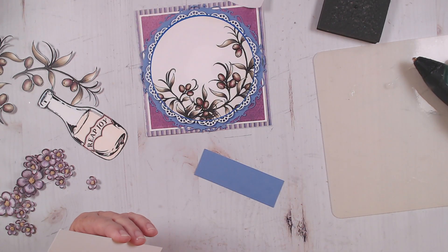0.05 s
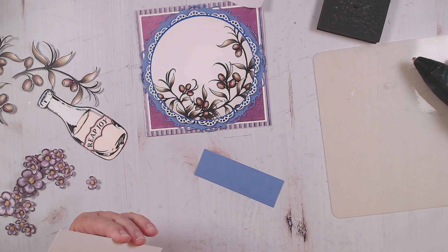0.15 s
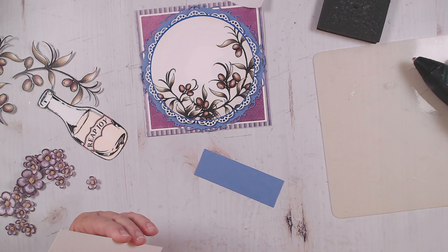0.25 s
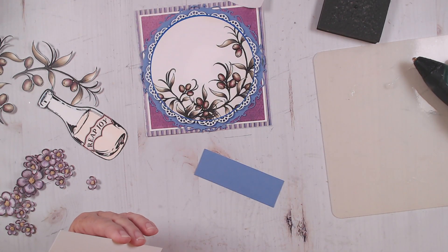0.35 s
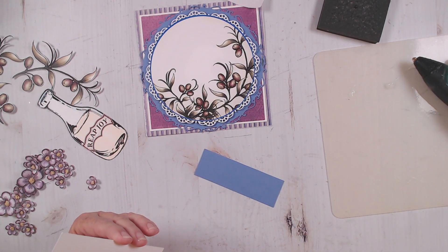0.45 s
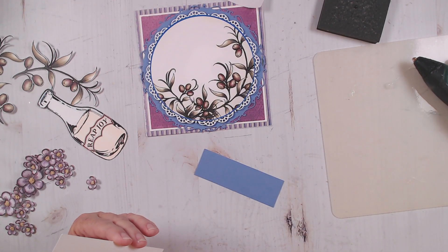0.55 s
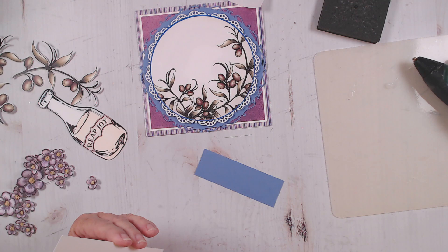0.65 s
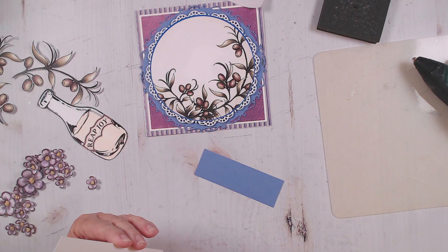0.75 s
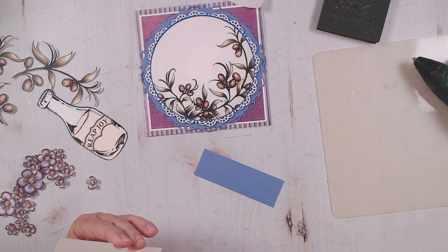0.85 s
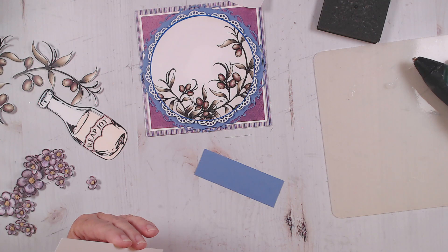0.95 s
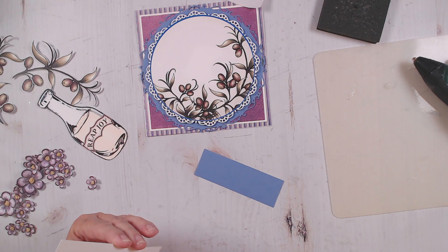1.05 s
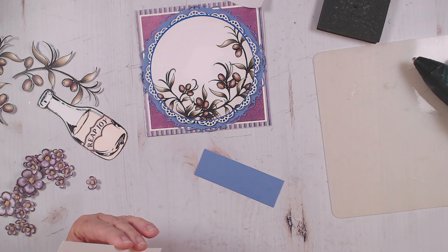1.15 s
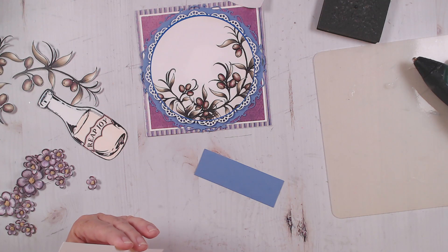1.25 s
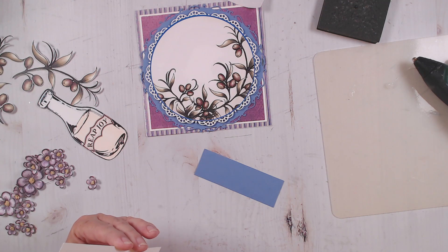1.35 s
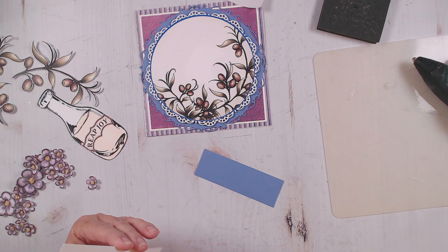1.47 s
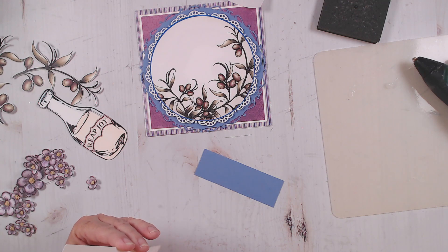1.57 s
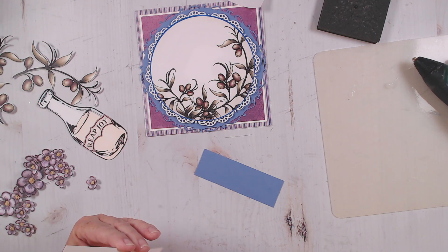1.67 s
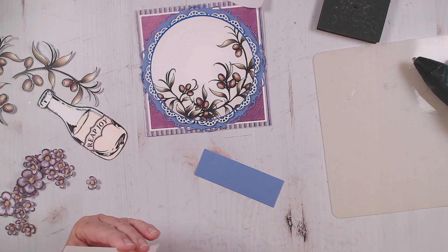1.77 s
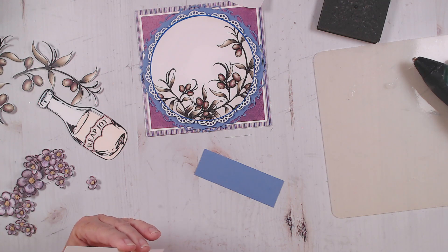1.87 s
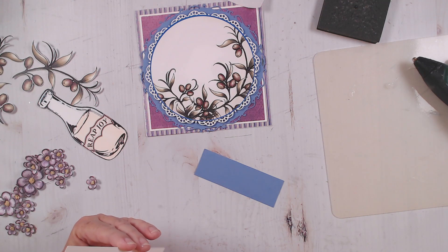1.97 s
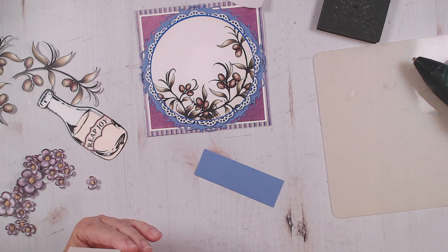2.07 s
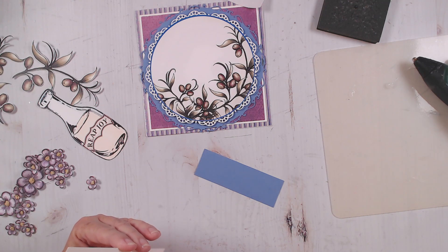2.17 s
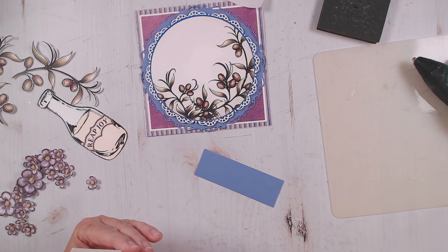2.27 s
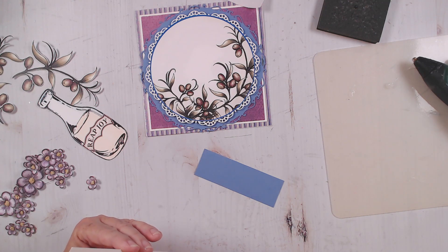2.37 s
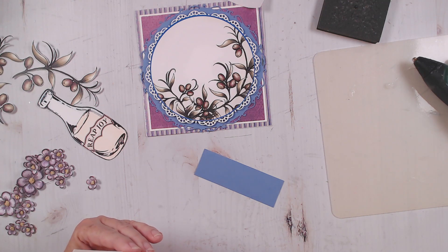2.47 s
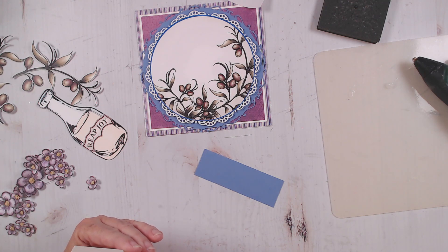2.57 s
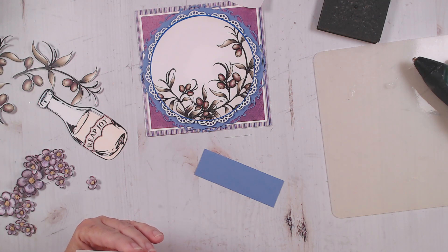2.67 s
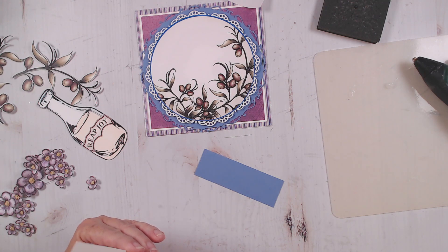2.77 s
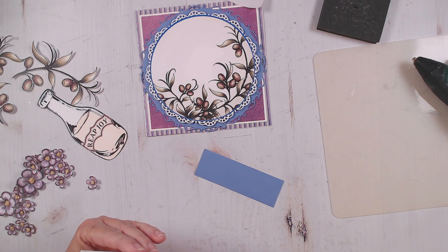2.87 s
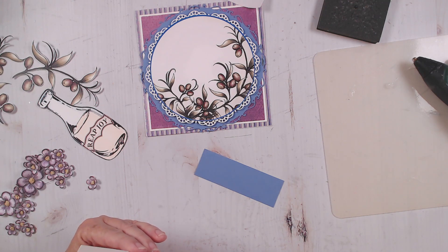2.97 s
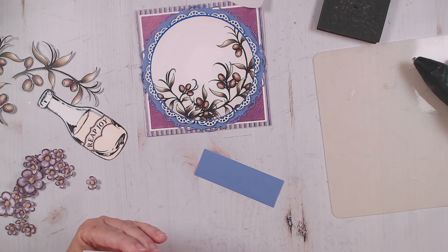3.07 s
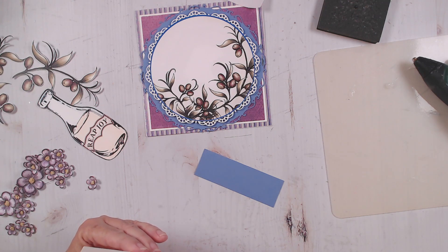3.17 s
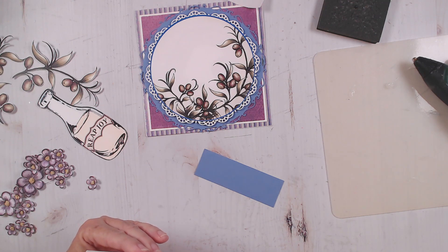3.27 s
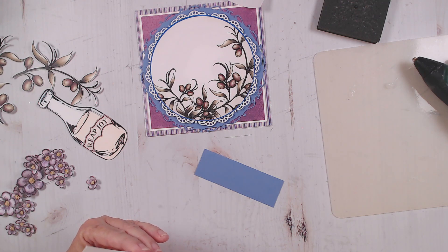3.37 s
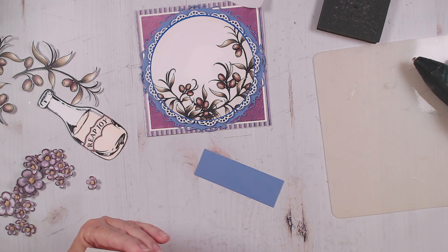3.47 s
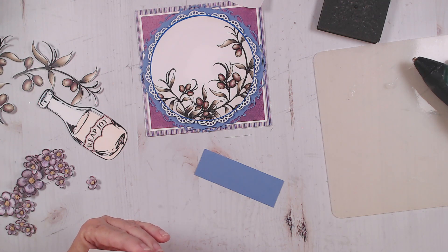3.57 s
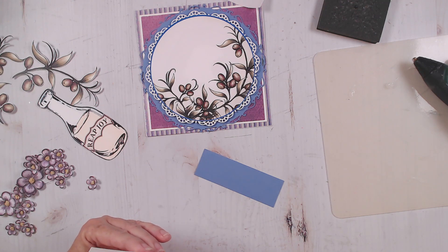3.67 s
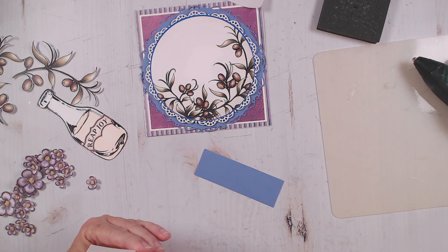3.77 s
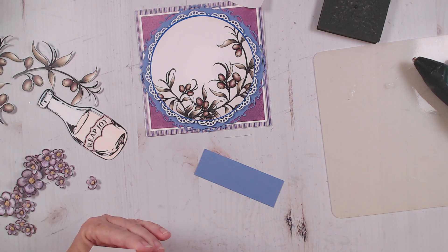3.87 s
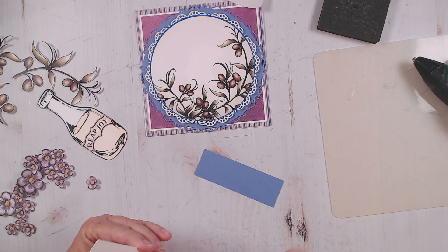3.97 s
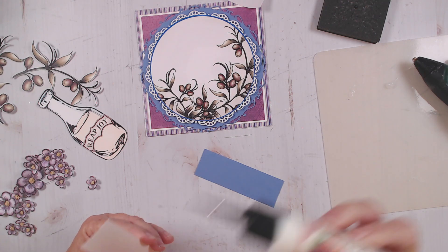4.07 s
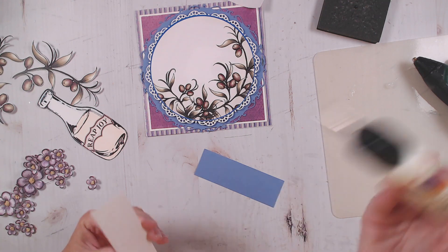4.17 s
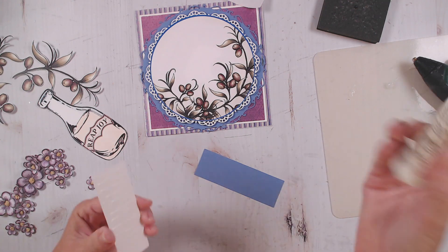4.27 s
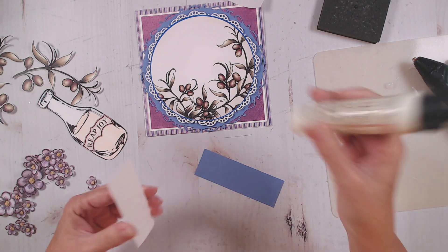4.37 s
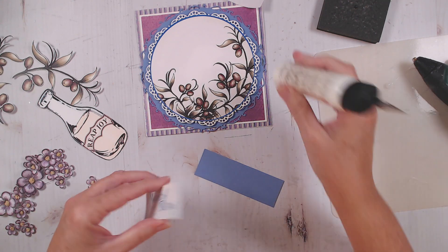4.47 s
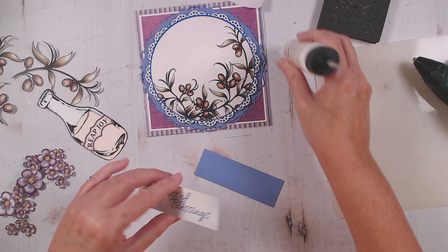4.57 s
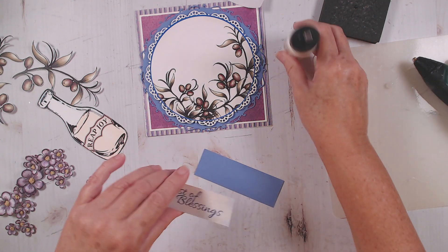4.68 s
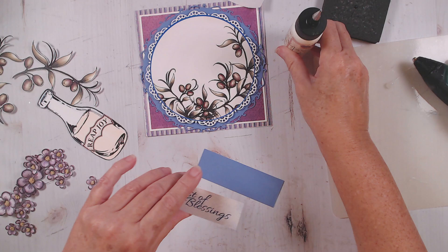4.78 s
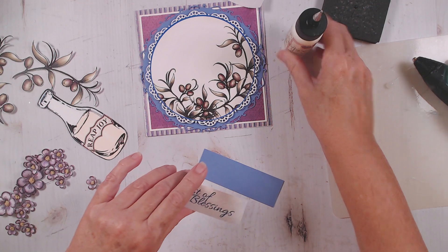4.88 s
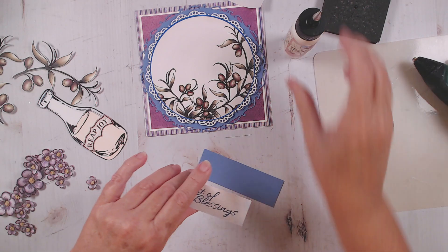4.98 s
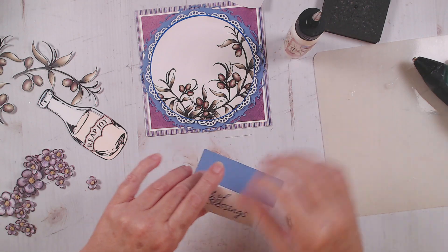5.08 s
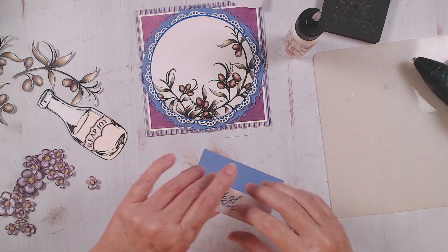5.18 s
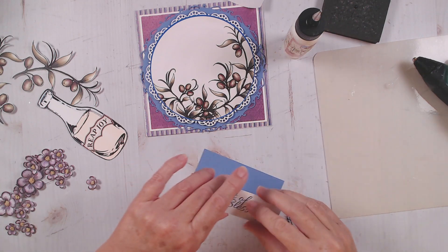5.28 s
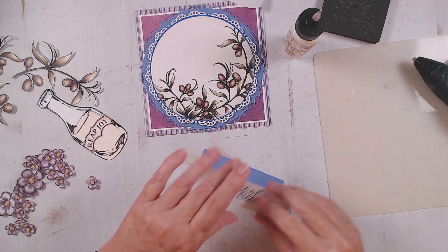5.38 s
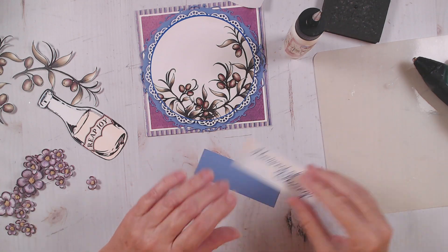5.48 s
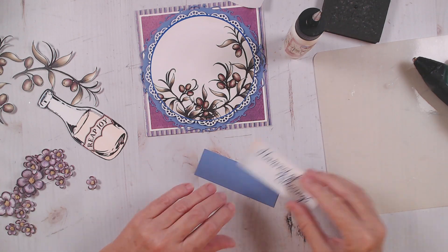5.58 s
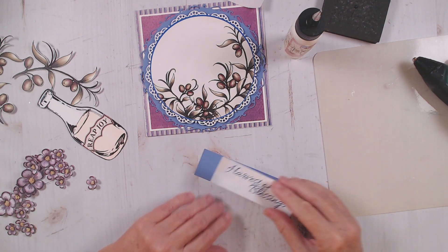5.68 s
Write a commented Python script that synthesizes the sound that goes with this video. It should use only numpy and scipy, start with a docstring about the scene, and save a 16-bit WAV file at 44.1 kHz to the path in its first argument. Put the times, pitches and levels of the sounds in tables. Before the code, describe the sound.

Quick scratchy, squeaky strokes of a glue nozzle on paper, followed by a plastic bottle thumping onto a tabletop and soft paper handling.

```python
"""A close microphone at a craft table in a quiet room hears a few faint brushes and taps.
Then a glue bottle's nozzle is scribbled to and fro over a slip of paper, about nine strokes a second,
rasping on the fibres and squeaking as it sticks and lets go. At 4.6 s the bottle is set down with a
thump that rings the table top, and rocks briefly. Last, hands slide, flick and press paper."""
import sys
import numpy as np
from scipy import signal
from scipy.fft import rfft, irfft, next_fast_len
from scipy.io import wavfile
from scipy.ndimage import map_coordinates

SR = 44100
rng = np.random.default_rng(int(sys.argv[2]) if len(sys.argv) > 2 else 0)


def dump_mix(stems):
    """Bounce the given channels to the path in sys.argv[1] as a 16-bit WAV at rate SR."""
    frames = np.atleast_2d(stems).T  # one column per channel
    limited = np.clip(frames, -1, 1)  # hard clip at full scale
    pcm = np.round(limited * 32767).astype(np.int16)
    wavfile.write(sys.argv[1], SR, pcm)


N = 252693

# strokes of the nozzle, push and pull in turn: middle t/s, length/s, level/dB
STROKES = [(.666, 0.022, -60), (.774, 0.027, -56), (.901, 0.017, -59), (1.136, 0.057, -47),
           (1.239, 0.049, -43.5), (1.343, 0.052, -45.5), (1.445, .047, -41.5), (1.555, 0.041, -43),
           (1.658, 0.054, -42), (1.77, 0.056, -42.5), (1.895, 0.067, -45.5), (1.99, 0.039, -42.5),
           (2.101, 0.054, -44.5), (2.206, 0.053, -41.5), (2.311, 0.056, -44.5), (2.424, 0.054, -43),
           (2.527, .054, -49.5), (2.619, 0.042, -44.5), (2.724, 0.0525, -45), (2.829, 0.049, -46),
           (2.934, 0.042, -46), (3.035, 0.05, -45.5), (3.141, 0.043, -48.5), (3.239, 0.053, -48),
           (3.362, 0.047, -47.5), (3.474, 0.054, -45.5), (3.593, .058, -48), (3.727, 0.057, -50.5)]
# how the paper answers along the way: t/s, hiss/dB, flex/dB, hollow note/dB, hollow note f/Hz
PAPER_ANSWER = [(.77, -2.5, -23, 2.5, 1200), (1.13, -7, -23, 1.5, 1133), (1.4, -9.5, -21, 0.5, 955),
                (1.79, -11.5, -27, 3.5, 900.2), (2.02, -10.5, -10.5, -3, 944), (2.55, -8, -8, -3.5, 973.6),
                (2.95, -7.5, -12.5, 1, 846.2), (3.22, -2.5, -14, -0.5, 952), (3.55, -6, -9.5, -5, 954),
                (3.73, -3, -7.5, -5, 1396)]


def scribble(shape=3.54, echo_s=0.000768, sweep_s=0.00041, light_db=-49.5):
    """The nozzle rubs to and fro, catching on the paper's fibres and bending the slip."""
    s, length, db = np.transpose(STROKES)
    hiss_db, flex_db, hollow_db, hollow_hz = read_curve(PAPER_ANSWER, s)
    touch_db = 2 * np.minimum(db - light_db, 0)  # light strokes barely squeak or sound hollow
    speed = swell(s[:, None], length[:, None], shape)
    bend = swell(s[:, None], 1.003 * length[:, None], shape)
    delay_s = echo_s + sweep_s * np.max(bend * rng.uniform(0.46, 2.03, (len(s), 1)), axis=0)
    grip = unit(amp(1.5 * wobble(130) + .4 * wobble(35)))  # the nozzle sticks and lets go
    drag = friction(rate=2500, spread_db=-2.5, smooth=0.92)
    rasp = amp(db - 4.5) @ speed * table_echo(paper_rasp(drag), delay_s, share=0.31)
    squeal = amp(db + touch_db - 12.5) @ speed * nozzle_squeak(s)
    push_db = 2.5 * directions()  # a push digs in and hisses more than a pull
    hiss = amp(db + hiss_db + push_db - 2.5) @ speed * fibre_hiss(drag)
    hollow = amp(hollow_db + touch_db - 59.5) @ bend * hollow_gap(hollow_hz)
    flex = amp(db + flex_db - 5) @ bend * paper_flex()
    tip = amp(-70) * swell(3.8, 0.13, shape) * ringing_noise(np.full(N, 2230), width_hz=360)
    return grip * (rasp + squeal + hiss) + hollow + flex + tip  # the tip drags faintly as it leaves


# tone of the nozzle on paper: f/Hz, level/dB
RASP_TONE = [(600, -36.5), (1200, -16), (1750, -28.5), (2000, -5.5), (2250, 1.5), (3300, 1.5), (4150, 1.5),
             (4800, -9.5), (5400, -43), (6500, -40), (8000, -15), (15000, -55)]
# how tight the paper is under the nozzle: t/s, pitch factor
TIGHTNESS = [(0.599, 0.89), (1.15, 1.083), (1.5, 1.05), (1.85, 1.09), (2.101, 0.95), (2.45, 0.95),
             (2.721, 1.04), (3, 1.01), (3.4, 0.93), (3.8, 0.96)]


def paper_rasp(drag, sag=.13):
    """Rubbed paper rings higher where it is tight, and lower in the middle of each stroke."""
    s, length, _ = np.transpose(STROKES)
    tightness, = read_curve(TIGHTNESS, np.arange(N) / SR)
    mid_stroke = np.max(swell(s[:, None], .75 * length[:, None], 2), axis=0)
    pitch = tightness * (1 + sag * (.75 - mid_stroke))
    rasp = map_coordinates(coloured(drag, RASP_TONE), [np.cumsum(pitch)], order=5, mode="mirror")
    return patchy(rasp, depth_db=4.2)


# tone of the paper's fibres: f/Hz, level/dB
HISS_TONE = [(4800, -5), (5700, -3), (6700, -1.5), (7350, -6.5), (8200, -8.5), (9500, -5.5), (11500, -6.5),
             (13000, -11.5), (15800, -16)]


def fibre_hiss(drag):
    """Tiny fibres catch on the nozzle and make a high hiss."""
    return patchy(coloured(drag, HISS_TONE), depth_db=5.5)


# pitch of the nozzle's squeak: t/s, f/Hz
SQUEAK_PITCH = [(1.13, 2720), (1.4, 3900), (1.56, 2890), (1.98, 2922), (2.15, 3420), (2.8, 3420),
                (3.04, 2557), (3.27, 3303), (3.73, 2300)]


def nozzle_squeak(stroke_times):
    """The nozzle's squeak rises on a push and falls on a pull."""
    hz, = read_curve(SQUEAK_PITCH, stroke_times)
    return squeak(glide(hz, rise=.03), jitter=0.054)


# tone of bending paper: f/Hz, level/dB
FLEX_TONE = [(200, -62), (380, -0.5), (520, 3.5), (700, -3.5), (900, -17), (1600, -14), (2600, -26.5)]


def paper_flex():
    """The slip gives a low rustle as it bends."""
    return patchy(coloured(rng.standard_normal(N), FLEX_TONE), depth_db=2.5)


def hollow_gap(hz):
    """The gap under the slip rings with two breathy notes that wander as it changes shape."""
    pitch = glide(hz, rise=0.082, sag=.1) * (1 + .07 * wobble(45))
    return ringing_noise(pitch, width_hz=104) + amp(-11) * ringing_noise(1.4 * pitch, width_hz=150)


# hard snags of the nozzle: t/s, level/dB, starting f/Hz
SNAGS = [(1.428, -36, 3940), (1.534, -45.5, 4850), (1.736, -44, 3180), (2.176, -46, 3300),
         (2.282, -38.5, 3523), (2.405, -37, 3360), (2.598, -46, 3210), (3.016, -42.5, 2525),
         (3.12, -44.5, 2506), (3.573, -42, 2812)]


def snags(rise_s=0.00094, t60=0.036, fall_per_s=6):
    """The nozzle sticks for a moment and frees itself with a short falling chirp."""
    level, pitch, t = np.zeros(N), np.zeros(N), np.arange(SR // 16) / SR
    for s, db, hz in SNAGS:
        add(level, s, amp(db - 60 * t / t60) * (1 - np.exp(-t / rise_s)))
        add(pitch, s, hz / (1 + fall_per_s * t))
    return level * squeak(pitch, jitter=0.051)


# notes the table top rings with: f/Hz, level/dB, t60/s (the time to fade by 60 dB)
TABLE_NOTES = [(59.6, -38, 0.56), (89, -32, 0.28), (129.6, -9, 0.12), (167, -7.5, 0.071), (202.8, -7, 0.11),
               (219.5, -8, 0.081), (243, -22.5, 0.069), (316, -40, 0.14), (442, -42.5, 0.057),
               (558, -46.5, 0.077)]
# which way each note first moves the top: +1 up, -1 down
FIRST_SWING = (-1, -1, -1, 1, 1, -1, 1, 1, -1, 1)
# blows from hands and the rocking bottle: t/s, level/dB, low-note boost/dB, high-note boost/dB
BLOWS = [(4.175, -31.5, -26, -12), (4.604, -3, 2, 1.5), (4.6594, -11.5, -11, 4.5), (4.695, -25.5, 5, 17),
         (4.752, -28, -22, -12), (4.806, -31.5, 2.5, -2), (4.821, -21.5, -26, -12),
         (5.6082, -20.5, -19, -4)]


def thumps(contact_s=0.00026):
    """Every blow rings the same table top; where and how softly it lands sets the mix of notes."""
    out, t = np.zeros(N), np.arange(SR // 2) / SR
    hz, db, t60 = np.transpose(TABLE_NOTES)
    notes = np.array(FIRST_SWING)[:, None] * np.sin(2 * np.pi * hz[:, None] * t)
    notes *= amp(-60 * t / t60[:, None])
    notes *= 1 - np.exp(-t / contact_s)  # the force takes a moment to build
    for s, level_db, low_db, high_db in BLOWS:
        add(out, s, amp(level_db + db + low_db * (hz < 180) + high_db * (hz > 300)) @ notes)
    return out


# notes of the bottle's base: f/Hz, level/dB, t60/s
BASE_NOTES = [(1065, -36, 0.029), (1220, -43, 0.032), (1310, -48, 0.024), (1570, -44, 0.028),
              (1730, -44, 0.021)]
# the bottle lands and rocks: t/s, ring level/dB, click level/dB
LANDINGS = [(4.6039, -2.5, -36.5), (4.6588, -34, -56), (4.6913, -43, -52.5), (4.803, -41, -56)]
# tone of plastic hitting wood: f/Hz, level/dB
CLICK_TONE = [(900, -38), (1300, 19.5), (1800, 3), (2600, -7), (4000, 0.5), (5500, 2), (7000, -5),
              (11000, -7), (15800, -11)]


def landings(click_t60=0.018):
    """The rim of the bottle's base clicks on the table and rings briefly."""
    out, click, t = np.zeros(N), np.zeros(N), np.arange(SR // 6) / SR
    ring = sum((-1) ** k * amp(db - 60 * t / t60) * np.sin(2 * np.pi * hz * t)
               for k, (hz, db, t60) in enumerate(BASE_NOTES))
    for s, db, click_db in LANDINGS:
        add(out, s, amp(db) * ring)
        add(click, s, amp(click_db - 60 * t / click_t60))
    return out + click * coloured(rng.standard_normal(N), CLICK_TONE)


# small taps of nails and card: t/s, level/dB, knock boost/dB, sparkle boost/dB
TICKS = [(0.3964, -41.5, -21, -28), (0.426, -43.5, -6, 0.5), (3.5455, -44.5, -8, -2),
         (3.983, -38, -6.5, -7), (4.046, -41.5, -18, -10), (4.0705, -38.5, -33, 0.5),
         (4.1773, -37.5, -26, -8), (4.8168, -43.5, -23, -16), (5.1425, -47, -4, -9),
         (5.2942, -39.5, -10, 4), (5.5972, -26, -20, -27), (5.603, -37.5, -8, -11), (5.672, -42, -14, -17)]
# a tap's low, middle and high tone: f/Hz, level/dB
KNOCK_TONE = [(40, -30), (150, 17), (400, 3.5), (1300, -0.5), (1800, -16), (2600, -15), (8000, -43)]
SNAP_TONE = [(500, -29), (1800, 12.5), (4000, 12.5), (6000, 11), (9000, 1), (15800, -29)]
SPARKLE_TONE = [(3000, -30), (7500, 13), (11000, 16), (15800, -4)]


def ticks(crack_t60=0.013, rise_s=0.00013, tail_t60=0.062, tail_db=-21, edge_hz=5200, edge_t60=0.00089):
    """Each tap flicks an edge, then leaves a brief crack of noise with a faint tail."""
    t = np.arange(SR // 8) / SR
    fade = amp(-60 * t / crack_t60) + amp(tail_db - 60 * t / tail_t60)
    fade *= 1 - np.exp(-t / rise_s)
    flick = np.sin(2 * np.pi * edge_hz * t) * amp(-60 * t / edge_t60)
    edge, knock, snap, sparkle = np.zeros((4, N))
    for s, db, knock_db, sparkle_db in TICKS:
        add(edge, s, amp(db) * flick)
        add(knock, s, amp(db + knock_db) * fade)
        add(snap, s, amp(db - 14) * fade)
        add(sparkle, s, amp(db + sparkle_db - 11) * fade)
    parts = (knock, KNOCK_TONE), (snap, SNAP_TONE), (sparkle, SPARKLE_TONE)
    return edge + sum(level * coloured(rng.standard_normal(N), tone) for level, tone in parts)


# bumps on the bottle's body: t/s, level/dB, f/Hz, t60/s
BUMPS = [(0.4243, -46.5, 1100, 0.012), (0.514, -50.5, 650, .02), (3.5453, -35.5, 465, 0.023),
         (3.9838, -43.5, 340, 0.018), (4.049, -47, 340, 0.013)]


def bumps():
    """The hollow plastic bottle gives a short tock as the nozzle skips."""
    out, t = np.zeros(N), np.arange(SR // 10) / SR
    for s, db, hz, t60 in BUMPS:
        add(out, s, amp(db - 60 * t / t60) * np.sin(2 * np.pi * hz * t))
    return out


# hands and paper sliding: middle t/s, length/s, level/dB, airy boost/dB
SLIDES = [(.01, 0.033, -59.5, 0.5), (0.113, 0.025, -61, 2.5), (0.47, 0.031, -72, 6),
          (4.226, 0.15, -64, -1.5), (4.418, 0.15, -68.5, 5), (4.926, 0.067, -53.5, 0.5),
          (5.169, 0.032, -59.5, -4.5), (5.289, 0.022, -59, -13), (5.44, 0.12, -61, -0.5),
          (5.613, 0.17, -62, -8.5)]
# tone of the swish and of its airy top: f/Hz, level/dB
SWISH_TONE = [(300, 9), (1000, -10), (2200, -4), (3100, -3.5), (3700, -0.5), (4600, -1.5), (6200, -10),
              (9000, -9.5), (15800, -43)]
AIRY_TONE = [(3000, -39), (6000, -9.5), (8500, -3), (11500, 1), (14000, -5.5), (15800, -5)]


def slides(ring_hz=3100, ring_db=-10):
    """Skin and paper brush the table with a soft swish; a dragged slip adds its own ring."""
    speed = np.array([swell(s, length, 2.17) for s, length, *_ in SLIDES])
    _, _, db, airy_db = np.transpose(SLIDES)
    drag = friction(rate=5000, spread_db=4.5, smooth=1)
    swish = amp(db) @ speed * patchy(coloured(drag, SWISH_TONE), depth_db=4.5)
    airy = amp(db + airy_db) @ speed * patchy(coloured(drag, AIRY_TONE), depth_db=2)
    ring = amp(db + ring_db) @ speed * ringing_noise(np.full(N, ring_hz), width_hz=550)
    return swish + airy + ring


def walls(x, bass_t60=.36, mid_t60=0.23, high_t60=0.1):
    """Sound bounces around the small room; the high notes die first."""
    hz, t, spectrum = signal.stft(rng.standard_normal(SR // 2), SR, nperseg=256)
    t60 = np.interp(hz, [200, 1200, 8000], [bass_t60, mid_t60, high_t60])
    tail = signal.istft(spectrum * amp(-60 * t / t60[:, None]), SR, nperseg=256)[1]
    return signal.fftconvolve(np.pad(x, (SR // 100, 0)), tail / np.linalg.norm(tail))[:N]


# tone of the background: f/Hz, level/dB
ROOM_TONE = [(15, -25), (25, -13), (42, 1.5), (100, -5), (140, 1), (175, -7), (225, 0), (370, -6),
             (600, -13.5), (1430, -19), (4330, -23.5), (6310, -28.5), (9900, -25), (10550, -18.5),
             (11200, -28), (15800, -31)]


def room_noise():
    """The room's low, steady murmur and the microphone's faint hiss."""
    return amp(-61.5) * coloured(rng.standard_normal(N), ROOM_TONE)


def friction(rate, spread_db, smooth):
    """Fibres of uneven size catch at random, rate times a second, over a smooth rub."""
    catches = (rng.random(N) < rate / SR) * rng.choice([-1, 1], N)
    sizes = amp(spread_db * rng.standard_normal(N))
    return unit(catches * sizes) + smooth * rng.standard_normal(N)


def squeak(hz, jitter):
    """The tone of fast sticking and slipping; its pitch wanders by the share jitter."""
    pitch = hz * (1 + jitter * (wobble(700) + wobble(90) / 2))
    return np.sqrt(2) * np.sin(2 * np.pi * np.cumsum(pitch) / SR)


def ringing_noise(hz, width_hz):
    """Noise gathered around one pitch, which may move."""
    a, b = (filtered(noise, lambda f: 1 / (1 + (2 * f / width_hz) ** 2))
            for noise in rng.standard_normal((2, N)))
    phase = 2 * np.pi * np.cumsum(hz) / SR
    return unit(a * np.cos(phase) + b * np.sin(phase))


def patchy(x, depth_db):
    """Each spot of the paper favours its own few pitches."""
    spectrum = signal.stft(x, nperseg=512)[2]
    blur = np.outer(np.hanning(6), np.hanning(9))
    patches = signal.fftconvolve(rng.standard_normal(spectrum.shape), blur, "same")
    return unit(signal.istft(spectrum * amp(depth_db * unit(patches)), nperseg=512)[1][:N])


def table_echo(x, delay_s, share):
    """x plus its echo off the table; a changing delay sweeps the tone."""
    return unit(x + share * map_coordinates(x, [np.arange(N) - delay_s * SR], order=3))


def swell(middle, length, shape):
    """The speed of a hand movement that starts and ends at rest."""
    away = np.abs(2 * (np.arange(N) / SR - middle) / length)
    moving = away < 10
    speed = np.zeros(away.shape)
    speed[moving] = np.exp(-away[moving] ** shape / 2)
    return speed


def glide(hz, rise, sag=0):
    """A pitch that rises on a push, falls on a pull and sags mid-stroke, by shares of hz."""
    s, length, _ = np.transpose(STROKES)
    travel = rise * directions()
    times = np.ravel([s - length / 2, s, s + length / 2], order="F")
    pitches = np.ravel([hz * (1 - travel), hz * (1 - sag), hz * (1 + travel)], order="F")
    return np.interp(np.arange(N) / SR, times, pitches)


def directions():
    """+1 for each push, -1 for each pull."""
    return (-1) ** np.arange(len(STROKES))


def wobble(rate):
    """A smooth random curve through rate points a second."""
    return map_coordinates(rng.standard_normal(int(N * rate / SR) + 4), [np.arange(N) * rate / SR])


def coloured(x, tone):
    """x shaped by a tone table, at strength 1."""
    f, db = np.transpose(tone)
    return unit(filtered(x, lambda hz: amp(np.interp(np.log(hz + 1), np.log(f), db))))


def filtered(x, response):
    """x with each frequency turned up or down by response."""
    size = next_fast_len(N + 8192)
    return irfft(rfft(x, size) * response(np.fft.rfftfreq(size, 1 / SR)), size)[:N]


def read_curve(curve, s):
    """Each column of a curve, read at the times s."""
    times, *columns = np.transpose(curve)
    return [np.interp(s, times, column) for column in columns]


def add(track, s, sound):
    """Mix a sound in at time s."""
    part = track[round(s * SR):][:len(sound)]
    part += sound[:len(part)]


def amp(db):
    """Decibels to a volume factor."""
    return 10 ** (np.asarray(db) / 20)


def unit(x):
    """x scaled to an average strength (rms) of 1."""
    return x / np.sqrt(np.mean(x ** 2) + 1e-20)


def scene():
    """Handwork, table thumps and their echoes over the steady background."""
    handwork = scribble() + snags() + ticks() + slides() + bumps() + landings()
    table = thumps()
    background = room_noise()
    echoes = walls(amp(-13.5) * handwork + amp(-21) * table)
    return (handwork + table + echoes + background)[None]


def record(dry, top_hz=15850):
    """Nothing above top_hz is kept."""
    return np.array([filtered(x, lambda hz: hz < top_hz) for x in dry])


dry = scene()
out = record(dry)
dump_mix(out)
```